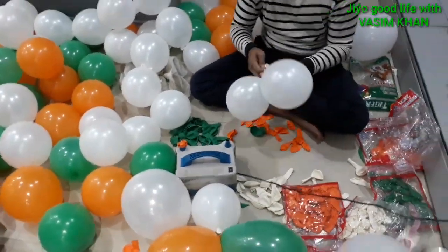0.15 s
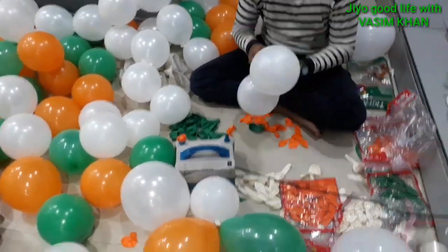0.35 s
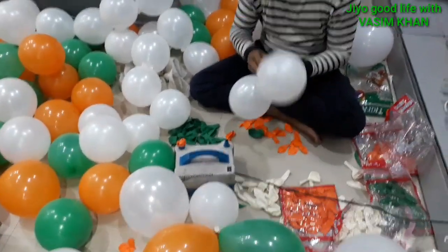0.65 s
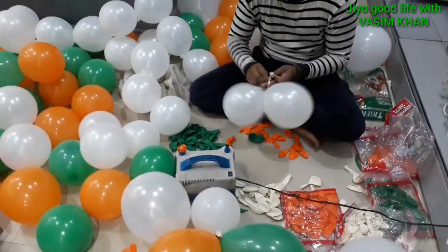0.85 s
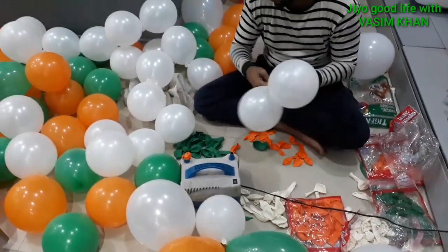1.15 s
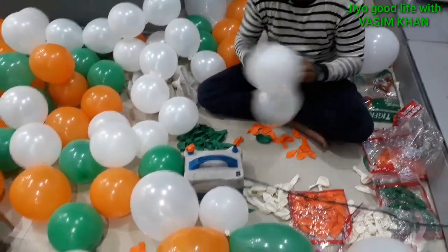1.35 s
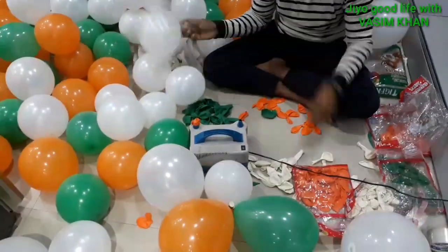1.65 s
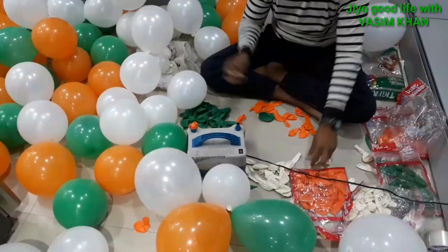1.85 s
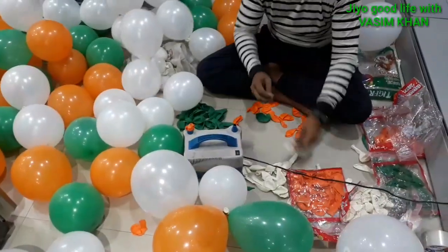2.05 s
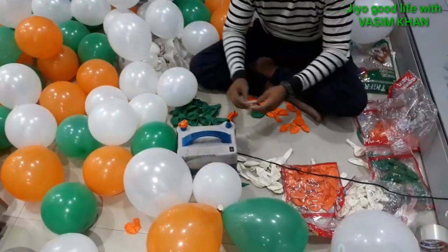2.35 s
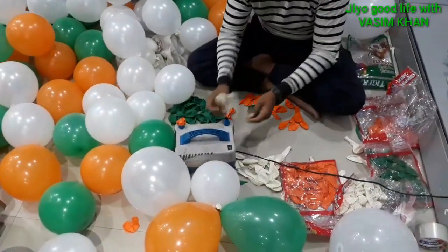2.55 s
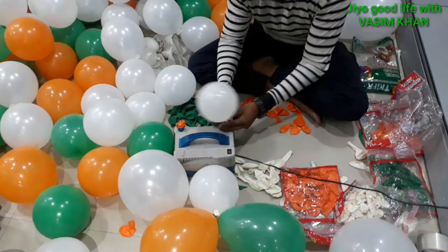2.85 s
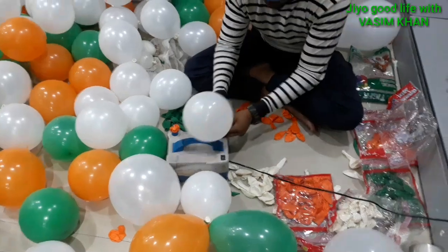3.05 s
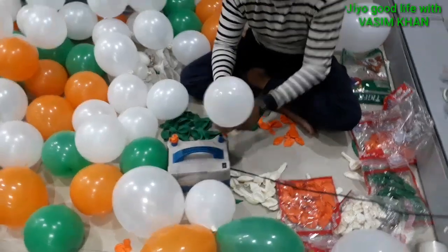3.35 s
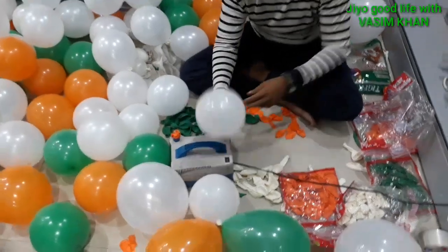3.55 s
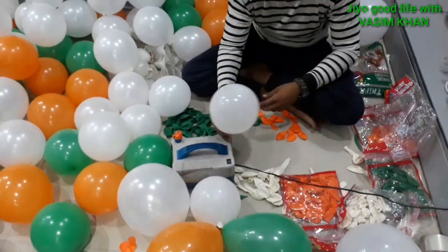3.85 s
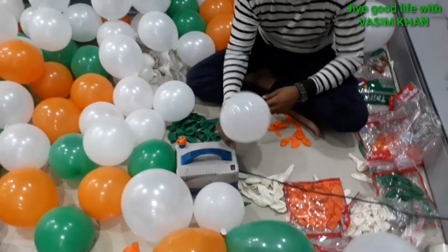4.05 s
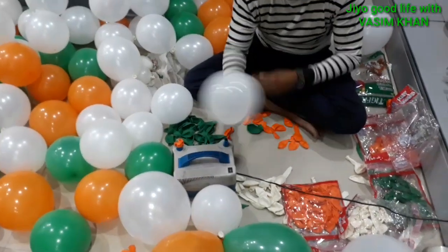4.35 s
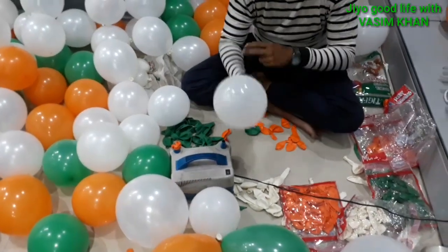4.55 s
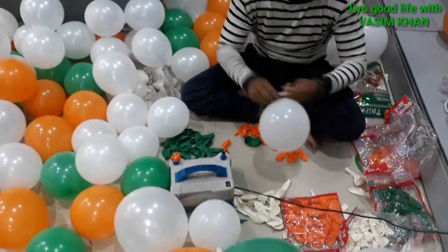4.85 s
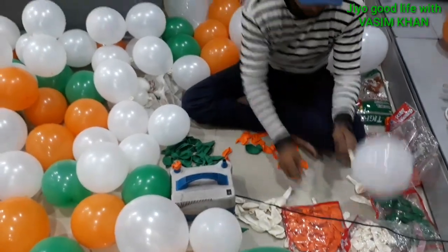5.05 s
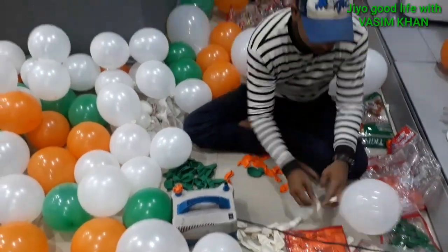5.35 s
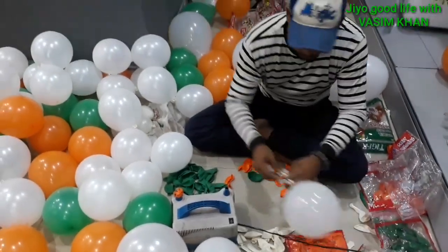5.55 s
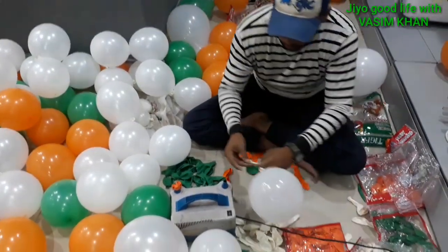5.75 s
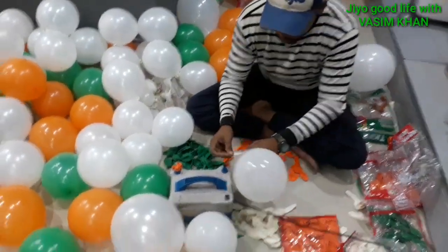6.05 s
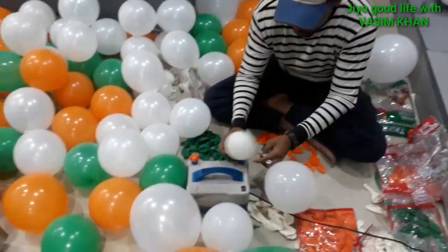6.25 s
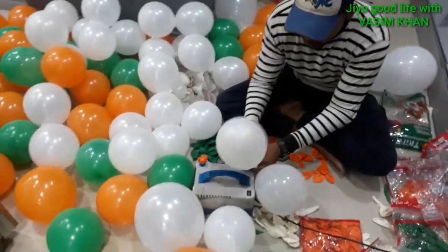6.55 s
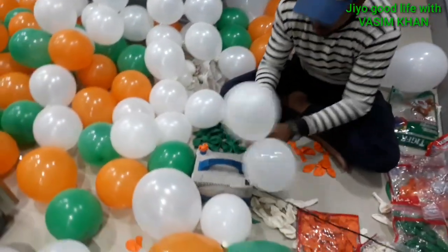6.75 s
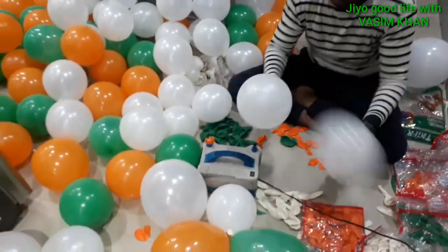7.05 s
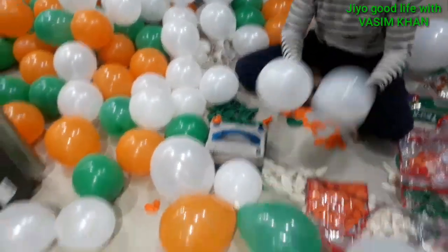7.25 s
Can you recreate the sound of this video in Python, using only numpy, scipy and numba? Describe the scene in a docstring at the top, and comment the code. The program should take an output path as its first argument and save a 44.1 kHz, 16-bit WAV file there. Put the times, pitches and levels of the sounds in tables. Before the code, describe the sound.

A small electric balloon pump whines and blows steadily indoors while two balloons are inflated with flapping necks, spurting hisses and brief breathy whistles.

```python
"""On a tiled floor, a metre or two from a hand-held phone, an electric balloon pump runs.
Its seven-bladed fan whines, while shaped noise makes the rush of the vents, the nozzle hiss and the case drone.
Twice a balloon goes on the nozzle: the neck flaps, jets spurt and whistle, and echoing noise roars in the rubber.
The fan speeds up a little on the first balloon. Early on, a full balloon is batted and rings in damped sines."""
import sys
import numpy as np
from scipy import signal
from scipy.fft import rfft, irfft
from scipy.io import wavfile
from scipy.ndimage import map_coordinates
from numba import njit

SR = 44100
rng = np.random.default_rng(int(sys.argv[2]) if len(sys.argv) > 2 else 0)


def wav_record(signal):
    """Record a signal, one row per channel, as 16-bit PCM in the file named by sys.argv[1]."""
    frames = np.transpose(np.atleast_2d(signal))
    bounded = np.clip(frames, -1, 1)
    # unit amplitude maps onto the largest positive 16-bit level
    quanta = np.round(bounded * 32767).astype(np.int16)
    wavfile.write(sys.argv[1], SR, quanta)


N = 326781
TIME = np.arange(N) / SR
FREQ = np.maximum(np.fft.rfftfreq(N, 1 / SR), 1)

# Tones locked to the fan shaft: (multiple of the shaft rate, level re blade-pass tone [dB])
FAN_TONES = [(1, -23), (3, -29), (7, 0), (8, -24), (14, -24)]
# Loudness of the blade-pass tone: (time [s], level [dB])
WHINE_LEVEL = [(0, -25), (.95, -19.5), (1.9, -19.3), (2.35, -24), (2.62, -22.5), (2.9, -31), (3.6, -26),
               (4.2, -24.5), (4.75, -27), (5.45, -20.3), (6.18, -20.7), (6.33, -29.5), (6.95, -30.5),
               (7.2, -22.5), (7.41, -20.5)]
# A blocked nozzle unloads the fan: (start [s], end [s], blade-pass rise it heads for [Hz])
BLOCKED_NOZZLE = [(2.7, 3.15, 60), (3.7, 4.26, 86)]
# Colour of the rush through the vents: (frequency [Hz], level [dB])
RUSH_COLOUR = [(300, -25), (1500, -16), (2000, -7), (2900, -7), (3300, 0), (4450, 1.5), (5100, -4.5),
               (5650, 0), (6300, -1), (7000, 0), (8000, -1), (8800, 0.5), (9450, -10.5), (15400, -11.5)]
# Vent resonances: (frequency [Hz], width [Hz], power added re the rush [dB])
VENT_RESONANCES = [(1890, 70, 1), (4040, 60, 5), (5530, 70, 0), (6790, 200, -2), (8480, 380, 2)]
# Air drawn through the vents: (time [s], rush level re free running [dB])
RUSH_LEVEL = [(0, 0.5), (.5, -0.5), (2.6, 0), (2.95, -3), (3.62, -1.5), (3.85, -3), (4.8, -5.5), (5.3, 0),
              (6.18, 1), (6.36, -5.5), (6.8, -4.5), (7.41, -3)]
# Colour of the nozzle hiss: (frequency [Hz], level [dB])
NOZZLE_COLOUR = [(3000, -28), (8000, -21), (9900, -4.5), (10800, 3), (12400, 3), (13000, 0), (15400, -5)]
# Nozzle resonances: (frequency [Hz], width [Hz], power added re the hiss [dB])
NOZZLE_RESONANCES = [(5900, 200, 11), (13350, 200, -2), (14350, 250, -5)]
# Colour of the case drone: (frequency [Hz], level [dB])
DRONE_COLOUR = [(25, -49), (60, -23), (95, -10.5), (140, -12.5), (200, -9.5), (300, -12), (550, -4),
                (650, -2), (1000, -0.5), (1200, -6), (1600, -8.5), (2500, -65)]
# Case resonances: (frequency [Hz], width [Hz], power added re the drone [dB])
CASE_RESONANCES = [(735, 28, 3), (880, 45, 6), (975, 30, -1), (1068, 30, 3), (1281, 28, 3)]
# Loudness of the case drone: (time [s], level [dB])
DRONE_LOUDNESS = [(0, -25.5), (1.6, -27), (2.15, -25), (2.8, -28), (4.0, -31.5), (4.22, -27.5),
                  (4.42, -30.5), (4.9, -30.5), (5.55, -26.5), (6.2, -26), (6.33, -33), (6.72, -30.5),
                  (7.05, -27.5), (7.41, -27.5)]
# Balloons on the nozzle: (steady jet starts [s], steady jet ends [s], filling starts [s], filling ends [s],
# roar inside [dB], steady jet at the neck [dB])
FILLED_BALLOONS = [(2.64, 4.357, 2.94, 3.69, -26.5, -23), (6.213, 6.8, 6.3, 6.92, -28, -21)]
# Colour of the air jet at the neck: (frequency [Hz], level [dB])
JET_COLOUR = [(500, -22), (2500, -8), (3700, 0), (4800, 1.5), (5800, 1.5), (7600, 2.5), (8700, -6.5),
              (9500, -11.5), (11000, -1), (12500, -7.5), (14000, -18), (15400, -30)]
# Spurts past the neck as the fingers shift: (start [s], end [s], level at the start [dB],
# whistle start [Hz], whistle end [Hz], whistle over the hiss [dB])
NECK_SPURTS = [(2.646, 2.697, -15, 3830, 3900, 4), (2.658, 2.777, -18, 6600, 7900, 1),
               (2.736, 2.793, -17, 4020, 3960, 10), (2.80, 2.935, -17, 4350, 4480, -3),
               (2.95, 3.1, -20.5, 4500, 4750, 0), (3.516, 3.6, -19, 6730, 6700, -12),
               (3.622, 3.685, -17.5, 3720, 3550, -4), (3.733, 4.252, -20.5, 5870, 5700, -5),
               (3.925, 4.007, -12.5, 5850, 5600, 2), (4.258, 4.297, -13.5, 3320, 4100, 3),
               (4.266, 4.374, -13, 5050, 6440, 0), (6.22, 6.262, -13.5, 4000, 4150, 6),
               (6.23, 6.357, -15.5, 4650, 5740, -1.5), (6.55, 6.73, -23, 6100, 6000, -1),
               (6.744, 6.903, -30, 2300, 1950, 9)]
# Thin leaks past the rubber: (start [s], end [s], level [dB])
RUBBER_LEAKS = [(3.05, 3.13, -29), (6.48, 6.72, -24.5)]
# Colour of the air inside a balloon: (frequency [Hz], level [dB])
HOLLOW_COLOUR = [(150, -25), (350, 1.5), (1000, -1.5), (1600, 7), (2200, 9), (2600, 9.5), (3200, 7.5),
                 (3900, 7.5), (4800, -14), (8000, -78)]
# Neck flaps, each a puff of air: (time [s], puff peak before the bass cut [dB], swing rate [Hz])
NECK_FLAPS = [(2.672, -16, 150), (2.684, -6, 131), (2.841, -15, 130), (2.972, -9.5, 156), (4.274, -14, 200),
              (4.296, -7, 240), (4.311, -6, 220), (4.333, -14, 190), (6.228, -12, 140), (6.237, -4.5, 145),
              (6.255, -8, 240), (6.281, -18, 130), (6.661, -10, 110)]
# Short sliding squeaks and hums, the higher ones from the pump case:
# (time [s], length [s], start [Hz], end [Hz], level before the swell [dB])
SQUEAKS = [(3.0, .17, 280, 330, -32), (3.11, .09, 930, 870, -22.5), (3.12, .05, 1150, 1050, -29),
           (3.69, .08, 800, 900, -24.5), (6.36, .14, 330, 280, -40)]
# Bumps on a full balloon: (time [s], peak of the first contact [dB], loss on each rebound [dB])
BALLOON_BUMPS = [(1.433, -11.5, 5), (1.568, -13.5, 2.5)]
# Ringing of a full balloon: (frequency [Hz], level [dB], time to fall by 60 dB [s])
BALLOON_RING = [(190, -5, 0.058), (259.5, 0, 0.12), (328, -3, 0.14), (373, 0, 0.087), (437, -1, 0.081)]

FREE_FAN_HZ, FAN_LAG_S, BLADES = 4176.5, .53, 7  # blade-pass pitch when running free, its lag
RUSH_DB = -15  # vents running free
NOZZLE_DB = 3.5  # nozzle hiss over the drone, with which it rises and falls
NOZZLE_FILLING_DB = -5  # muffling while a balloon fills
NOZZLE_FADE_DB_PER_S = -.35  # the hiss slowly gets quieter
COVER_S, FILL_ATTACK_S, FILL_RELEASE_S = 0.086, 0.31, .07
SPURT_ATTACK_S, SPURT_RELEASE_S, SPURT_SAG_DB = .022, 0.023, -1.5
LEAK_EDGE_S, REBOUND_S = .06, .016
ECHO_DB, SWAY_S = -18, .00003  # level of each echo, wander of its delay
TOP_HZ = 15420


def undb(db):
    """Turn decibels into gain."""
    return 10 ** (np.asarray(db) / 20)


def unit(x):
    """Scale to rms 1."""
    return x / np.sqrt(np.mean(x ** 2))


def curve(rows):
    """Draw a two-column table as automation, sample by sample."""
    times, values = np.transpose(rows)
    return np.interp(TIME, times, values)


def gate(start, end, attack_s, release_s):
    """Open from 0 to 1 and close again, on ramps centred on start and end."""
    opening = np.clip(.5 + (TIME - start) / attack_s, 0, 1)
    closing = np.clip(.5 + (end - TIME) / release_s, 0, 1)
    return opening * closing


def add(track, s, sound):
    """Mix a short sound in at time s."""
    i = int(s * SR)
    track[i:i + len(sound)] += sound[:N - i]


def walk(rate):
    """Smooth random drift of rms 1: noise held to rates below about rate [Hz]."""
    return unit(irfft(rfft(rng.standard_normal(N)) / (1 + (FREQ / rate) ** 4), N))


def turbulence(colour, resonances=()):
    """Air noise of rms 1: a broad colour with resonances standing on it."""
    hz, db = np.transpose(colour)
    gain = undb(np.interp(np.log(FREQ), np.log(hz), db))
    power = 1 + sum(undb(d) ** 2 / (1 + (2 * (FREQ - f) / width) ** 2) for f, width, d in resonances)
    return unit(irfft(rfft(rng.standard_normal(N)) * gain * np.sqrt(power), N))


@njit
def resonate(x, hz, width):
    """State-variable band-pass with a moving centre."""
    y, band, low = np.empty(len(x)), 0., 0.
    for i in range(len(x)):
        g, damping = np.tan(np.pi * hz[i] / SR), width / hz[i]
        v = (band + g * (x[i] - low)) / (1 + g * (g + damping))
        band, low, y[i] = 2 * v - band, low + 2 * g * v, damping * v
    return y


def breathy_tone(air, hz, width_hz):
    """Noise through two equal band-passes in a row: a breathy tone of rms 1."""
    once = resonate(air, hz, float(width_hz))
    return unit(resonate(once, hz, float(width_hz)))


def fan_pitch():
    """Blade-pass pitch [Hz]: the rotor creeps up while the nozzle is blocked and sinks back afterwards."""
    rise = sum(hz * (TIME > start) * (TIME < end) for start, end, hz in BLOCKED_NOZZLE)
    step = 1 / (FAN_LAG_S * SR)
    return FREE_FAN_HZ + signal.lfilter([step], [1, step - 1], rise)


def whine(covered, waver_hz=0.32, flutter_db=0.4, covered_flutter_db=1.5):
    """Blade-pass tone and fainter shaft orders; the pitch wavers, and the level flutters more under a balloon."""
    blade_pass_hz = fan_pitch() + waver_hz * walk(9.2)
    shaft = 2 * np.pi * np.cumsum(blade_pass_hz) / (SR * BLADES)
    tones = sum(undb(d) * np.sin(k * shaft) for k, d in FAN_TONES)
    flutter = (flutter_db + covered_flutter_db * covered) * walk(13)
    return np.sqrt(2) * undb(curve(WHINE_LEVEL) + flutter) * tones


def blower(fills, gust_db=0.65, throb_db=1.1):
    """Moving air rushes through the vents, hisses out of the nozzle and makes the case drone."""
    drone_db = curve(DRONE_LOUDNESS)
    nozzle_db = drone_db + NOZZLE_DB + NOZZLE_FILLING_DB * fills + NOZZLE_FADE_DB_PER_S * TIME
    gust = undb(gust_db * walk(38))
    rush = turbulence(RUSH_COLOUR, VENT_RESONANCES) * undb(RUSH_DB + curve(RUSH_LEVEL))
    hiss = turbulence(NOZZLE_COLOUR, NOZZLE_RESONANCES) * undb(nozzle_db)
    drone = turbulence(DRONE_COLOUR, CASE_RESONANCES) * undb(drone_db + throb_db * walk(5.0))
    return gust * (rush + hiss) + drone


def jet(width_hz=780, sputter_db=1.83):
    """Air squeezes past the neck: steady hiss under a balloon, and spurts with a sliding, breathy whistle."""
    steady_gain = sum(undb(db) * gate(start, end, COVER_S, COVER_S) for start, end, _, _, _, db in FILLED_BALLOONS)
    out = turbulence(JET_COLOUR) * steady_gain
    source = turbulence(JET_COLOUR)
    for start, end, db, start_hz, end_hz, whistle_db in NECK_SPURTS:
        air = np.roll(source, rng.integers(N))  # a fresh stretch of noise
        progress = np.interp(TIME, [start, end], [0, 1])
        hz = start_hz + (end_hz - start_hz) * progress
        whistle = breathy_tone(air, hz, width_hz)
        spurt = unit(air[::-1] + undb(whistle_db) * whistle)  # reversed, so hiss and whistle are unrelated
        level = undb(db + SPURT_SAG_DB * progress)
        out += spurt * level * gate(start, end, SPURT_ATTACK_S, SPURT_RELEASE_S)
    return out * undb(sputter_db * walk(28))


def filling(start, end, db, first_trip_s=0.0005, last_trip_s=0.00101, bounce=0.12):
    """The jet echoes across the balloon; the round trip lengthens as it grows, so its resonances sink."""
    volume = np.interp(TIME, [start, end], [0, 1])
    trip = first_trip_s + (last_trip_s - first_trip_s) * np.cbrt(volume)  # width goes as the cube root
    air = turbulence(HOLLOW_COLOUR)
    roar = unit(sum(bounce ** k * np.interp(TIME - k * trip, TIME, air) for k in range(4)))
    return roar * undb(db) * gate(start, end, FILL_ATTACK_S, FILL_RELEASE_S)


def flaps(cycles=1.04, rise_s=0.00014, snap_db=-7.0, snap_s=0.0034, snap_hz=1900):
    """The neck slaps the nozzle: one heavily damped swing of pressure and a small rubbery snap."""
    out, t = np.zeros(N), TIME[:SR // 10]
    for s, db, hz in NECK_FLAPS:
        decay = np.exp(-np.log(1000) * t * hz / (2 * cycles))  # down 60 dB after 2 * cycles swings
        onset = 1 - np.exp(-(t / rise_s) ** 2)
        puff = np.cos(2 * np.pi * hz * t) * decay * onset
        grit = unit(signal.lfilter(*signal.butter(1, snap_hz, fs=SR), rng.standard_normal(len(t))))
        snap = undb(snap_db) * grit * np.exp(-t / snap_s)
        add(out, s, undb(db) * (puff / np.abs(puff).max() + snap))
    return signal.sosfilt(signal.butter(2, 55, "high", fs=SR, output="sos"), out)


def leak(centre_hz=12100, width_hz=2000):
    """A narrow gap between rubber and nozzle hisses very high."""
    opening = sum(undb(db) * gate(start, end, LEAK_EDGE_S, LEAK_EDGE_S) for start, end, db in RUBBER_LEAKS)
    return breathy_tone(rng.standard_normal(N), np.full(N, float(centre_hz)), width_hz) * opening


def squeaks(width_hz=150):
    """Noise through a narrow, sliding band swells and dies: short squeaks and hums, the higher from the case."""
    out = np.zeros(N)
    for s, length, start_hz, end_hz, db in SQUEAKS:
        air = rng.standard_normal(int(length * SR))
        hz = np.linspace(start_hz, end_hz, len(air))
        swell = np.sin(np.linspace(0, np.pi, len(air)))
        add(out, s, undb(db) * breathy_tone(air, hz, width_hz) * swell)
    return out


def bumps(detune=0.032, contact_s=0.0038, count=4):
    """A batted full balloon rings hollowly in damped sines, with softer rebounds close behind."""
    out, t = np.zeros(N), TIME[:SR // 4]
    for s, db, loss_db in BALLOON_BUMPS:
        for rebound in range(count):
            stretch = 1 + detune * rng.standard_normal(len(BALLOON_RING))
            ring = np.zeros(len(t))
            for (hz, mode_db, t60), k in zip(BALLOON_RING, stretch):
                ring += undb(mode_db - 60 * t / t60) * np.sin(2 * np.pi * (hz * k * t + rng.random()))
            ring = ring * (1 - np.exp(-(t / contact_s) ** 2))  # soft contact
            add(out, s + rebound * REBOUND_S, undb(db - rebound * loss_db) * ring / np.abs(ring).max())
    return out


def reflections(x, echo_db, sway_s, count=10):
    """Floor, balloons and walls send short echoes whose paths change as the hand sways."""
    out = x.copy()
    for lag_s in rng.uniform(.002, .03, count):
        place = (TIME - lag_s - sway_s * walk(0.98)) * SR
        echo = map_coordinates(x, [place], order=3, prefilter=False)
        out += undb(echo_db) * rng.choice([-1, 1]) * echo
    return out / np.sqrt(1 + count * undb(echo_db) ** 2)  # keep the overall level


def scene():
    """Mix pump, inflation and handling, the same in both ears; whine, flaps and bumps stay free of echoes."""
    covered = sum(gate(start, end, COVER_S, COVER_S) for start, end, *_ in FILLED_BALLOONS)
    fills = sum(gate(start, end, FILL_ATTACK_S, FILL_RELEASE_S) for _, _, start, end, _, _ in FILLED_BALLOONS)
    roars = sum(filling(start, end, db) for _, _, start, end, db, _ in FILLED_BALLOONS)
    inflation = jet() + leak() + roars
    room = reflections(blower(fills) + inflation + squeaks(), ECHO_DB, SWAY_S)
    return np.tile(room + whine(covered) + flaps() + bumps(), (2, 1))


def record(dry):
    """The phone rounds the tallest peaks, drops the deepest bass and cuts the top."""
    rounded = dry / (1 + (dry / .72) ** 8) ** (1 / 8)
    lean = signal.sosfilt(signal.butter(2, 40, "high", fs=SR, output="sos"), rounded)
    return signal.sosfilt(signal.ellip(12, .1, 90, TOP_HZ, fs=SR, output="sos"), lean)


dry = scene()
out = record(dry)
wav_record(out)
```